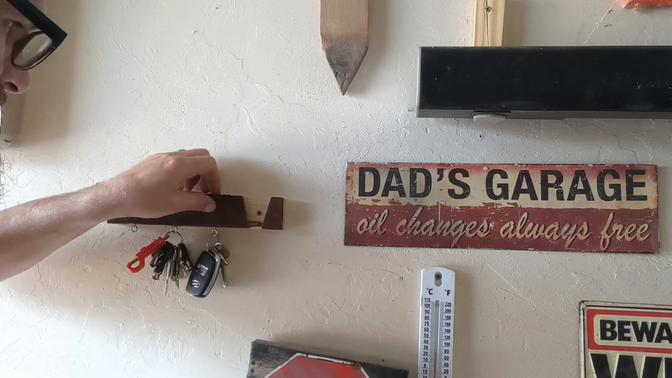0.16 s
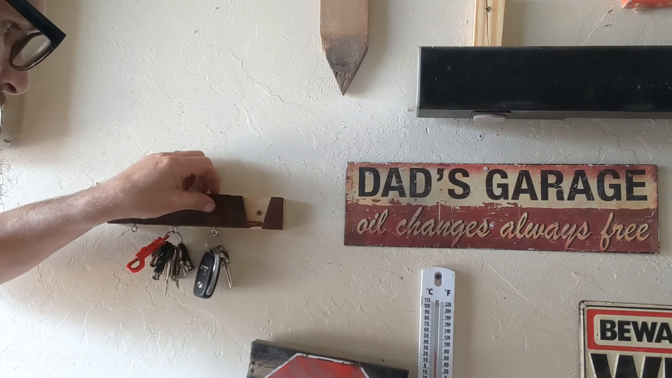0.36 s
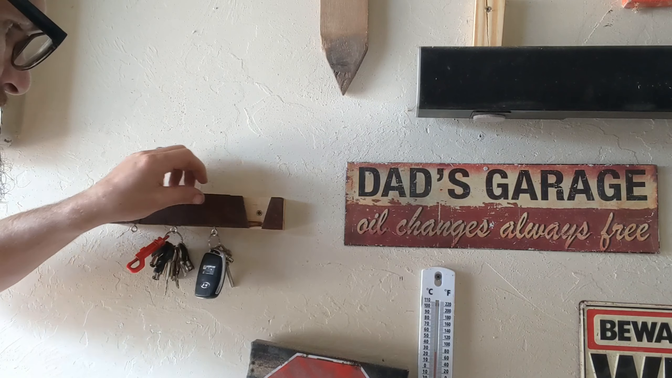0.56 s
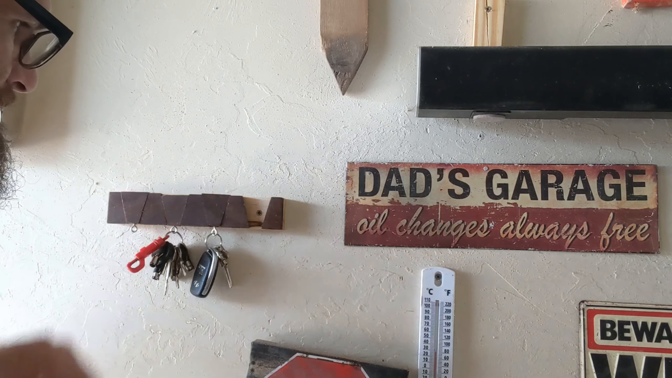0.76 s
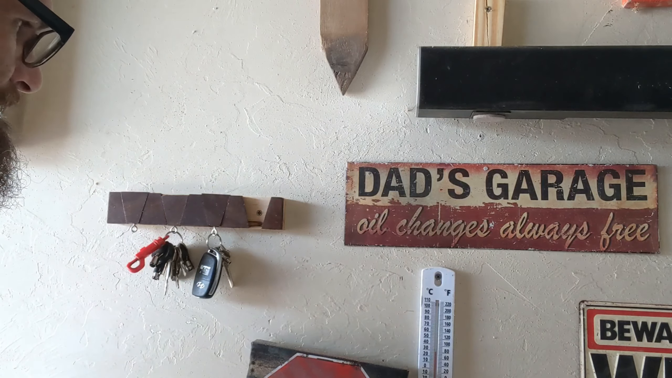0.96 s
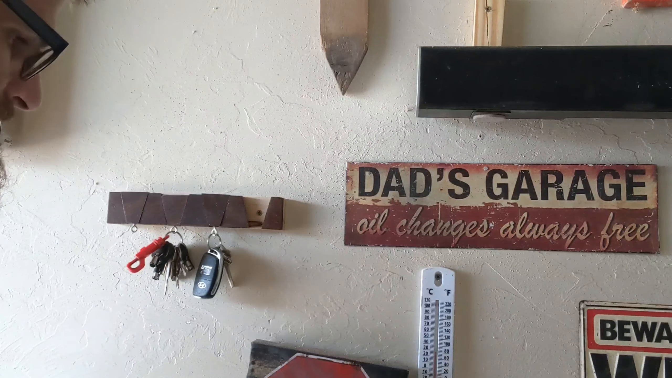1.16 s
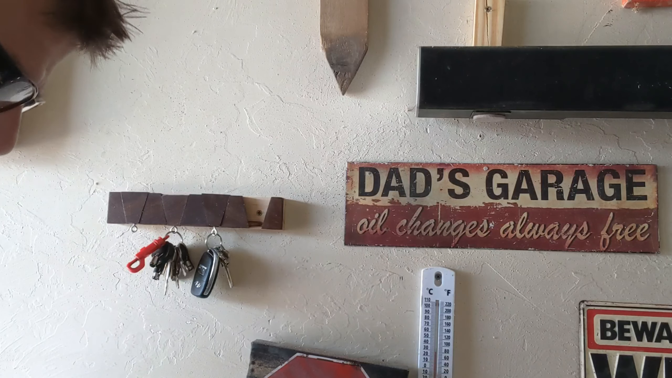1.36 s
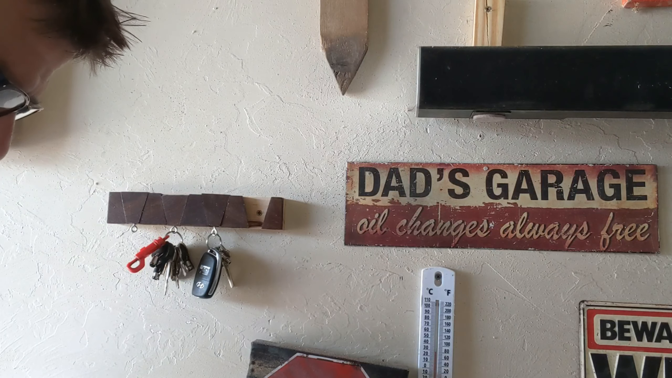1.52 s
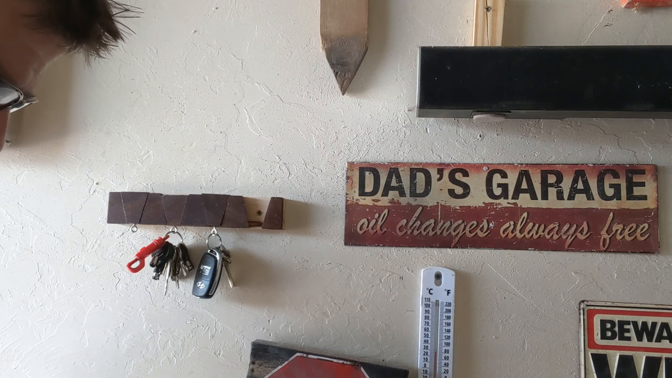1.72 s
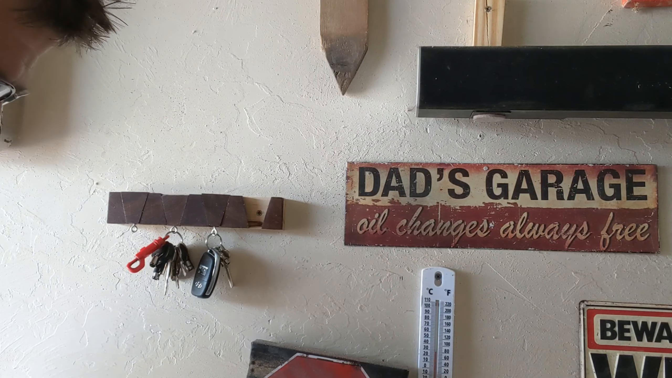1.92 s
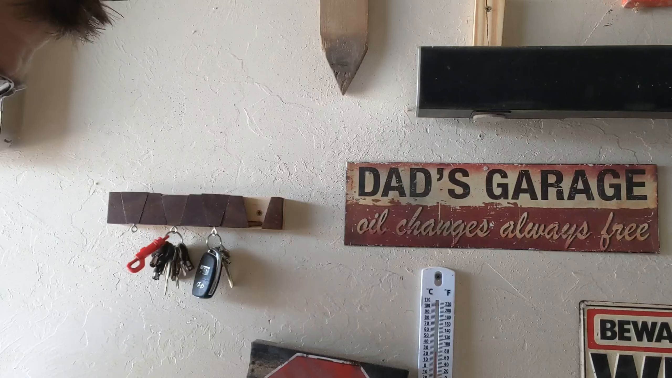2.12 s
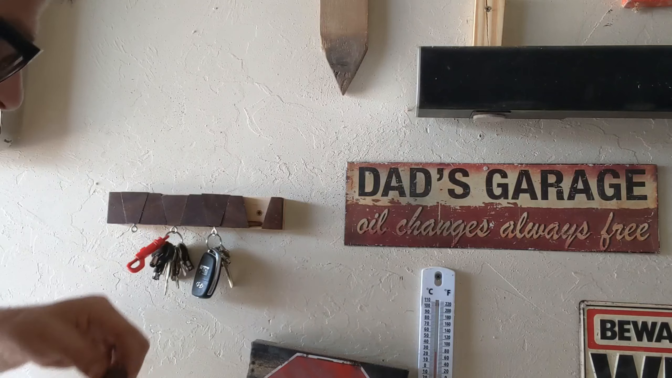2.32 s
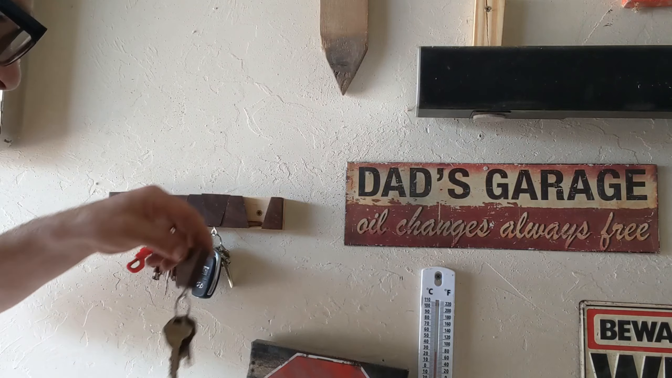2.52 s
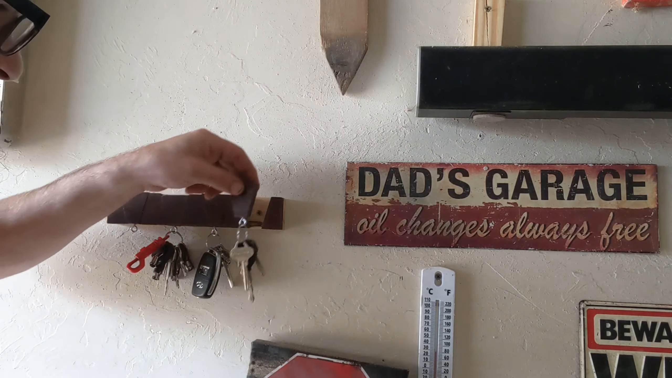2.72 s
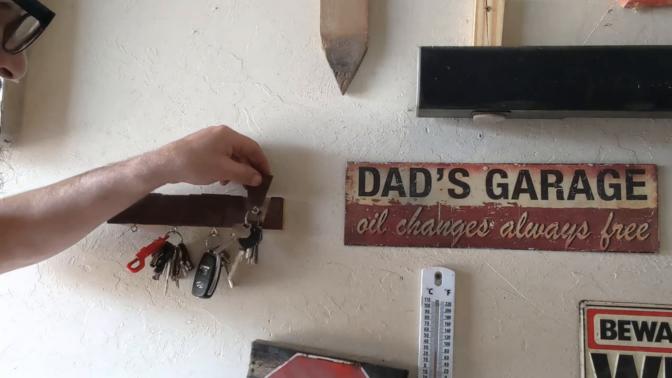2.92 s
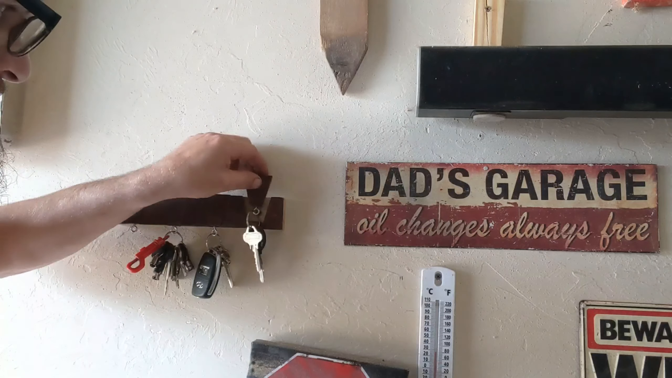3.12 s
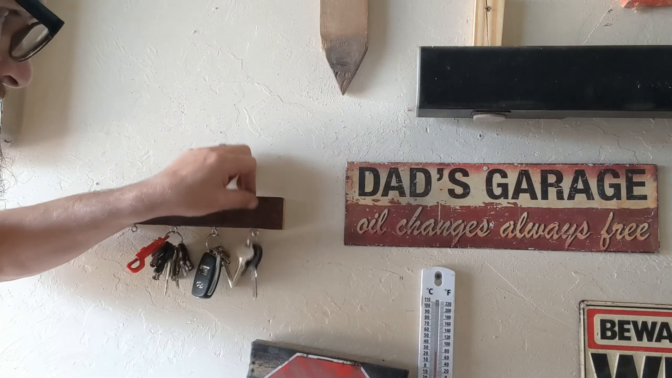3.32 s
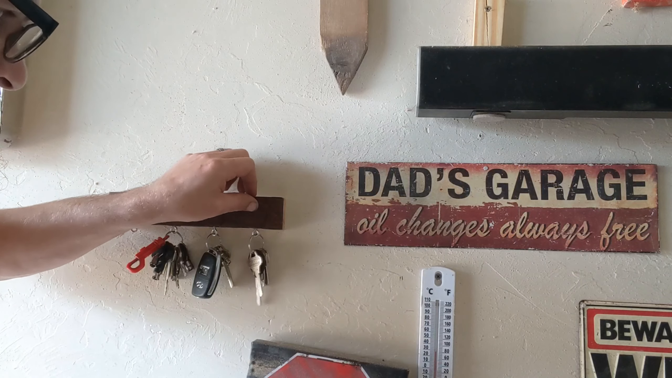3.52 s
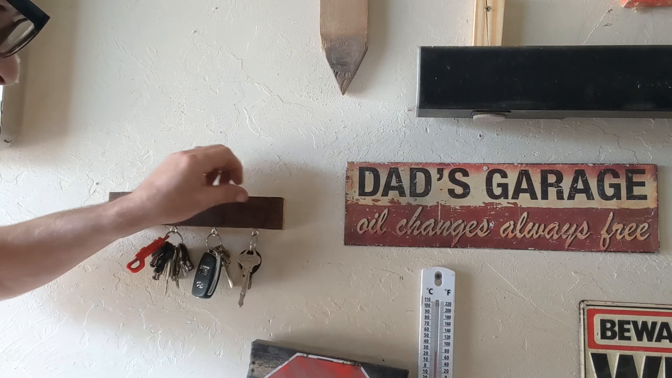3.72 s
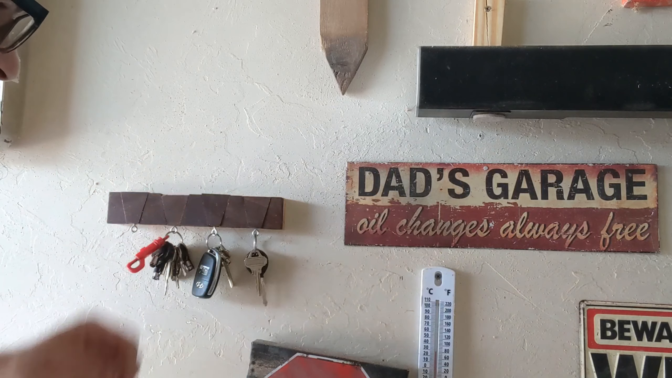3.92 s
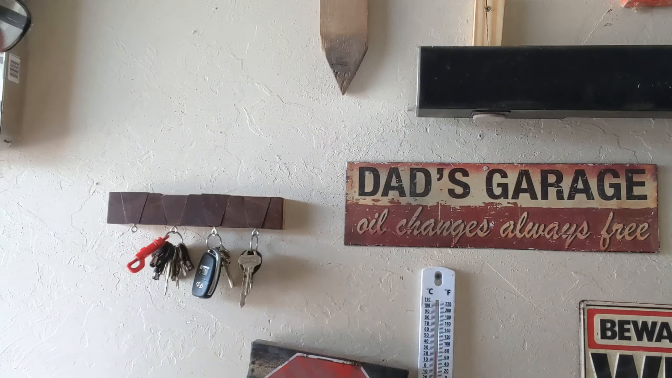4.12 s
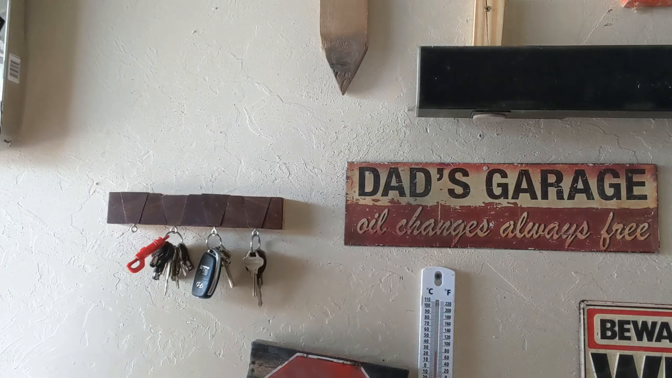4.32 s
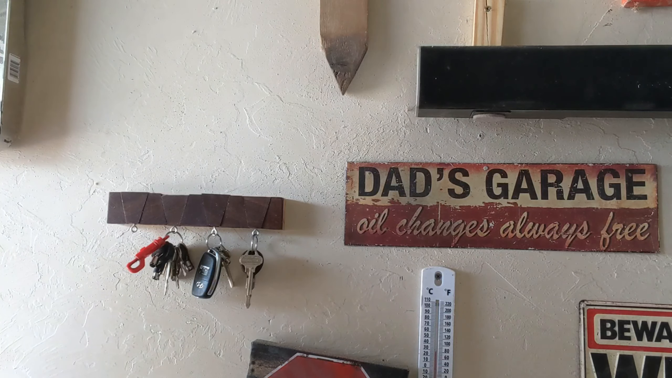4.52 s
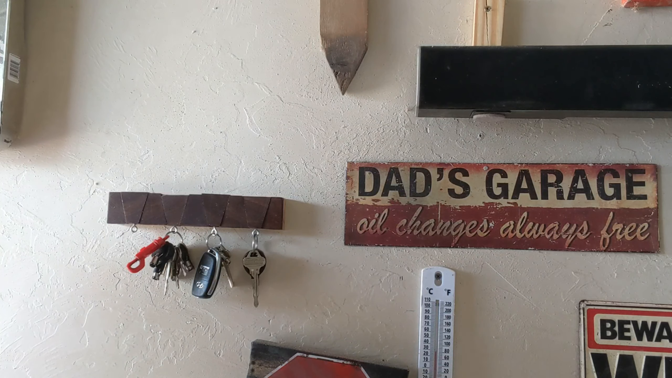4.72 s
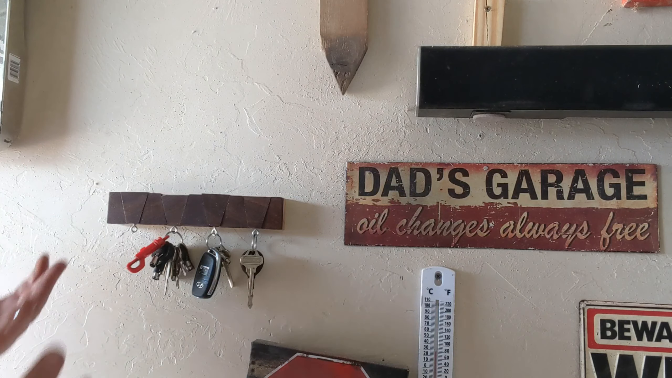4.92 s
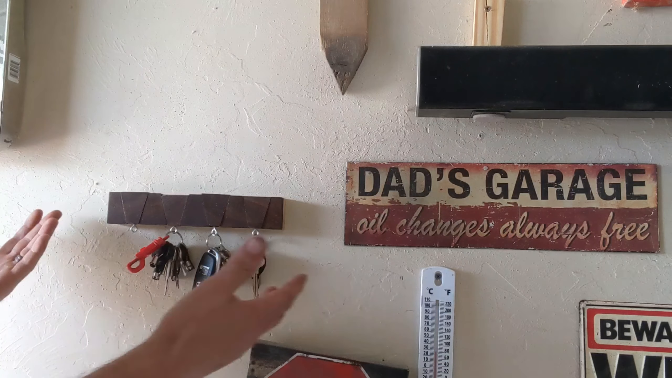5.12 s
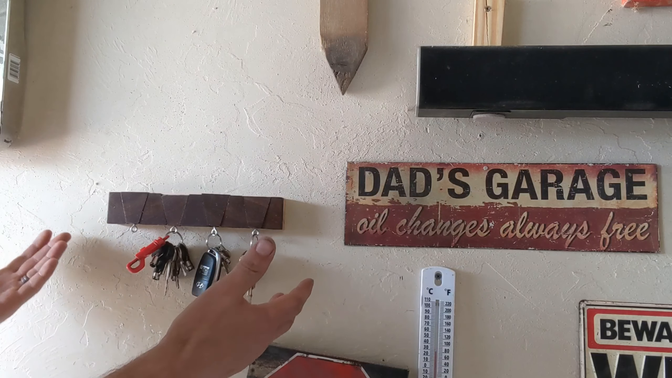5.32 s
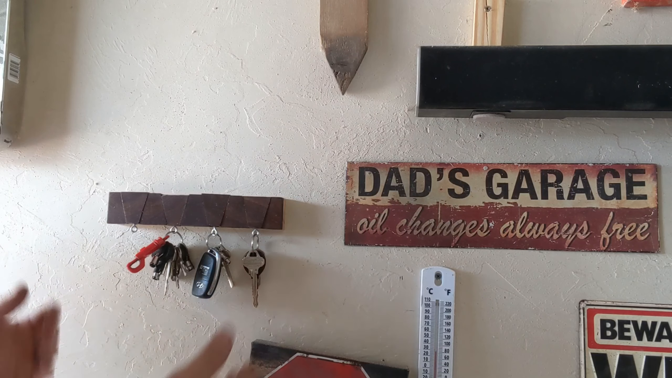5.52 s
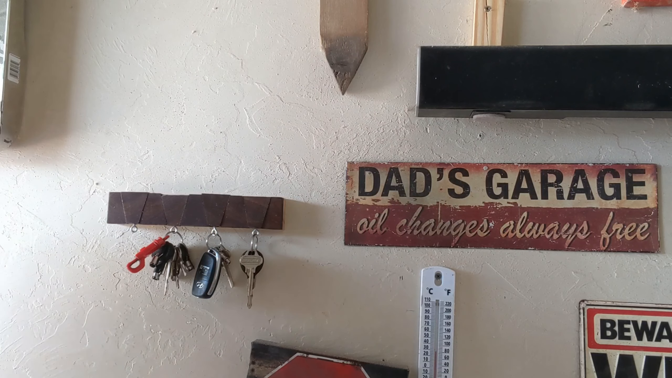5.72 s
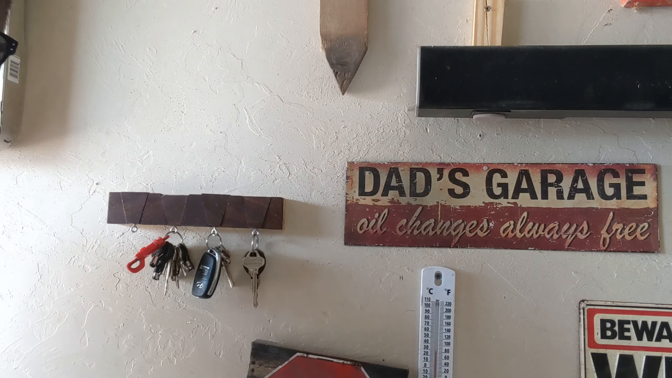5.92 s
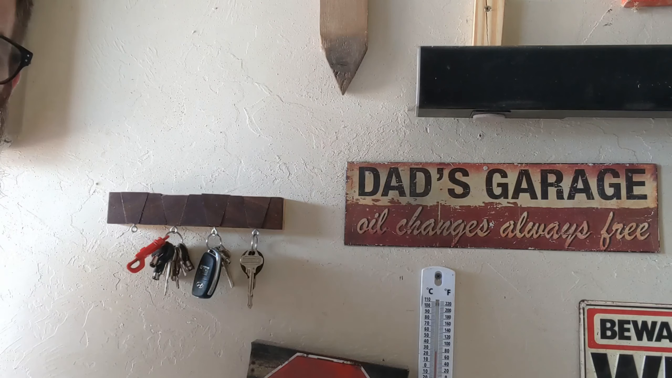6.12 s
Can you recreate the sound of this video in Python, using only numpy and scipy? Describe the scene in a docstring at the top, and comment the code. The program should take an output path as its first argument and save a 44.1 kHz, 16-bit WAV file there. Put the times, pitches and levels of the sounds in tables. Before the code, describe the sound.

Close to the microphone, a soft footstep and scuff come first, then a near-quiet gap. A bunch of keys jingles in a bright burst, tinkles more lightly, and clinks again. A hard clack of metal on wood follows, then a denser rattle as the bunch is hung. Small scuffs and a last soft step end it. A bare garage echoes briefly over low rumble and hum.

```python
"""Keys clink and ring, wooden pegs knock a rack, and hands and shoes scuff, echoing between bare walls over a low rumble:
bunches of keys are lifted, carried and hung on a wooden rack on a garage wall, close to a phone.
Metal contacts are noise cracks that stir the key modes; wood and floor are banks of decaying modes.
Rubs are dense noise slips; the echo is decaying noise, and the background is coloured noise with a hum."""
import sys
import numpy as np
from scipy import signal
from scipy.fft import rfft, irfft, next_fast_len
from scipy.io import wavfile
from scipy.ndimage import uniform_filter1d

SR = 44100
rng = np.random.default_rng(int(sys.argv[2]) if len(sys.argv) > 2 else 0)


def wav_record(signal):
    """Record a signal, one row per channel, as 16-bit PCM in the file named by sys.argv[1]."""
    frames = np.transpose(np.atleast_2d(signal))
    bounded = np.clip(frames, -1, 1)
    # unit amplitude maps onto the largest positive 16-bit level
    quanta = np.round(bounded * 32767).astype(np.int16)
    wavfile.write(sys.argv[1], SR, quanta)


N = 271656
T = np.arange(N) / SR


def undb(db):
    """Level law: decibels become an amplitude ratio."""
    return 10 ** (np.asarray(db) / 20)


def unit(x):
    """Normalisation: scale to an rms of one."""
    return x / np.sqrt(np.mean(x ** 2))


def on_log(hz, table):
    """Logarithmic pitch scale: interpolate a table of frequency in Hz and value."""
    table = np.array(table)
    return np.interp(np.log(hz + 1), np.log(table[:, 0]), table[:, 1])


def band(x, lo_hz, hi_hz):
    """Band-pass filtering: keep the sound between two frequencies."""
    return signal.sosfilt(signal.butter(2, [lo_hz, hi_hz], "band", fs=SR, output="sos"), x)


def colour(x, table):
    """Spectral shaping: weight the spectrum by a table of frequency in Hz and gain in dB."""
    length = x.shape[-1]
    size = next_fast_len(length)
    gain = undb(on_log(np.fft.rfftfreq(size, 1 / SR), table))
    return irfft(rfft(x, size) * gain, size)[..., :length]


def walk(rate):
    """Slow random modulation: a new random level every 1 / rate s, joined by straight slopes; spread near 1."""
    hold = int(SR / rate)
    levels = np.repeat(rng.standard_normal(N // hold + 1), hold)
    return uniform_filter1d(levels, hold)[:N]


def ring(times, db, modes, scatter_db, push_s):
    """Modal resonance: each blow pushes every mode for push_s, in shares that vary with where it lands."""
    out, at = np.zeros(N), (np.asarray(times) * SR).astype(int)
    luck = rng.standard_normal((len(at), len(modes)))
    push = np.hanning(int(push_s * SR) + 3)[1:-1]
    push = push / push.sum()
    for k, (hz, mode_db, t60) in enumerate(modes):
        blows = np.zeros(N)
        np.add.at(blows, at, undb(db + mode_db + scatter_db * luck[:, k]))
        decay = np.log(1000) / (max(t60, .005) * SR)
        pole = np.exp(2j * np.pi * hz / SR - decay)
        # turning the push with the mode keeps even a long push in step with it
        carried = np.convolve(blows, push * pole ** np.arange(len(push)))[:N]
        out += signal.lfilter([1], [1, -pole], carried).imag
    return out


def bursts(times, db, fade_s, rise_s):
    """Impact noise: at each blow an exponential decay, its onset smoothed over rise_s, shapes noise."""
    blows = np.zeros(N)
    np.add.at(blows, (np.asarray(times) * SR).astype(int), undb(db))
    shape = signal.lfilter([1], [1, -np.exp(-1 / (fade_s * SR))], blows)
    return uniform_filter1d(shape, int(rise_s * SR) + 1) * rng.standard_normal(N)


# Likeness of far sound at the two ports. Each row: frequency in Hz, left-right correlation [none].
FAR_LIKENESS = [(50, 0.91), (250, 0.9), (1000, 0.167), (3000, 0.062), (7000, 0.22), (16000, .5)]


def spread(mid, side):
    """Diffuse-field coherence: two unrelated sounds make a left and right as alike as far sound is."""
    like = [(hz, np.clip(c, 0, .99)) for hz, c in FAR_LIKENESS]
    mid = colour(mid, [(hz, 10 * np.log10((1 + c) / 2)) for hz, c in like])
    side = colour(side, [(hz, 10 * np.log10((1 - c) / 2)) for hz, c in like])
    return np.array([mid + side, mid - side])


# Spectrum of the background. Each row: frequency in Hz, relative density in dB per Hz.
AIR_SPECTRUM = [(15, -28), (25, -17.5), (70, 1.5), (166, 0.5), (236, -7), (317, -18.5), (754, -19.5),
                (1100, -27.5), (1740, -27.5), (4610, -35), (8140, -39.5), (11300, -36.5), (14400, -40),
                (16000, -45.5)]
AIR_DB = -44.5  # middle of the wandering level
HUM_HZ, HUM_DB = 57.5, -48  # middles of the wandering pitch and level


def air():
    """Broadband and tonal background: outside rumble and faint hiss swell a little beside a wavering hum."""
    noise = spread(*colour(rng.standard_normal((2, N)), AIR_SPECTRUM))
    hum_level = undb(HUM_DB + 2.32 * walk(11.0))
    hum_phase = 2 * np.pi * np.cumsum(HUM_HZ + 3 * walk(7.3)) / SR
    hum = hum_level * np.sin(hum_phase)
    return undb(AIR_DB + 2.86 * walk(2.806)) * unit(noise) + hum


# Reverberation of the garage. Each row: frequency in Hz, time to fall by 60 dB in seconds.
GARAGE_T60 = [(150, 0.72), (1000, 0.54), (4000, 0.6), (9000, 0.28), (15000, 0.29)]
ECHO_DB = -7.5  # level of the echoes


def garage(x):
    """Statistical reverberation: dense echoes as noise that decays at its own pace in each octave."""
    t, tail = T[:SR // 2], 0
    for hz in 68.9 * 2. ** np.arange(9):
        noise = band(rng.standard_normal((2, len(t))), hz / 2 ** .5, min(hz * 2 ** .5, 20000))
        tail = tail + noise * np.exp(-np.log(1000) * t / on_log(hz, GARAGE_T60))
    first_walls = np.clip((t - .002) / 0.0028, 0, 1)  # they answer after a few ms
    tail = spread(*tail * first_walls)
    tail = tail / np.sqrt(np.sum(tail ** 2) / 2)
    return signal.fftconvolve(x[None], tail)[:, :N]


# Heels set down. Each row: start in seconds, relative thump level in dB, slap against it in dB.
HEELS = [(0.137, -21.5, -1), (5.862, -17, -1.5)]
# Modes of the floor slab. Each row: frequency in Hz, relative level in dB, time to fall by 60 dB in seconds.
SLAB_MODES = [(138, 1.5, 0.21), (258, -12, 0.13), (57.6, 7, 0.037)]


def steps():
    """Damped floor resonance: soft soles thump the slab, with a dull slap."""
    s, db, slap_db = np.transpose(HEELS)
    slap = band(bursts(s - .014, db + slap_db + 9, 0.019, 0.014), 210, 1120)
    return ring(s, db, SLAB_MODES, scatter_db=-4.5, push_s=0.0069) + slap


# Modes of the keys and rings of the bunch. Each entry: frequency in Hz.
KEY_MODES = np.array([3650, 3860, 6209, 7210, 8595, 9028, 9685, 9790, 10140, 10310, 10620, 11600, 11640, 11700, 12531, 12890, 13260, 13670, 13907, 14680, 15229])


def metallic(x, width_hz):
    """Resonant filtering: sound heard through the damped modes of the bunch, without the two lowest."""
    return sum(signal.lfilter(*signal.iirpeak(hz, hz / width_hz, SR), x) for hz in KEY_MODES[2:])


# Rubs of hands, shoes and key rings. Each row: time of greatest strength in seconds, bright level in dB,
# dull part against it in dB, swell constant in seconds, fade constant in seconds.
RUBS = [(0.0, -60, 24, .01, 0.024), (0.118, -30.5, 7.5, 0.026, 0.034), (0.168, -36.5, -2, 0.022, 0.052),
        (0.94, -48.5, -23, .012, .06), (1.08, -50.5, -7.5, 0.031, .15), (1.219, -24.5, -16, 0.026, 0.032),
        (1.289, -28.5, -21, 0.033, 0.024), (1.491, -29, -16, .03, 0.0093),
        (1.56, -45.5, -3.5, 0.0077, 0.097), (1.62, -58, 4.5, 0.036, .05), (1.82, -51.5, -21, .03, .02),
        (1.94, -35, -36, 0.015, 0.025), (1.99, -45.5, -19, .01, 0.12), (2.281, -36.5, -24.5, 0.019, 0.085),
        (2.468, -33, -24.5, 0.011, 0.053), (2.878, -22, -2.5, 0.0042, 0.06), (3.21, -48.5, 7, 0.043, 0.3),
        (3.381, -18.5, -5, 0.013, 0.055), (3.48, -21.5, -4.5, 0.026, .02),
        (3.53, -24.5, -5.5, 0.0057, 0.039), (3.94, -57.5, -6, 0.057, 0.087),
        (4.149, -44, 5.5, 0.034, 0.044), (4.369, -48.5, -1, 0.12, .08), (4.751, -46.5, -2.5, 0.11, 0.083),
        (5.281, -47.5, -2, 0.045, 0.077), (5.831, -41, 3, 0.0077, 0.047), (5.88, -40.5, 2, 0.03, 0.063)]
RUB_MIDDLE_DB, RUB_MIDDLE_SHARE = -3.5, 0.37  # the middle part follows the dull part by this share
# rubs with less dull part than this are metal on metal: part of their bright power stirs the key modes
METAL_BELOW_DB, METAL_SHARE, METAL_WIDTH_HZ = -10, .6, 60


def rubbing():
    """Stick-slip friction: dense tiny slips of uneven size sound bright and dull as each rub swells and fades."""
    slips = rng.standard_normal(N) * undb(2.2 * rng.exponential(size=N) + 1.8 * walk(120))
    parts = []
    for lo_hz, hi_hz in [(7500, 17700), (1400, 4090), (295, 1760)]:
        lumps = undb(2 * walk(140))  # each part catches and slips in its own lumps
        parts.append(unit(band(slips, lo_hz, hi_hz) * lumps))
    parts.append(unit(metallic(parts[0], METAL_WIDTH_HZ)))
    power = np.zeros((len(parts), N))
    for s, db, dull_db, swell_s, fade_s in RUBS:
        shape = undb(db) * np.exp(-np.where(T < s, (s - T) / swell_s, (T - s) / fade_s))
        metal = METAL_SHARE * (dull_db < METAL_BELOW_DB)
        middle = undb(RUB_MIDDLE_DB + RUB_MIDDLE_SHARE * dull_db) ** 2
        shares = [1 - metal, middle, undb(dull_db) ** 2, metal]
        power += np.outer(shares, shape ** 2)
    return np.sum(np.sqrt(power) * parts, axis=0)


# Wood on wood. Each row: start in seconds, relative knock level in dB, wall boom against it in dB.
PEG_KNOCKS = [(0.113, -13.5, -4.5), (0.388, -37, -8), (1.222, -18.5, -15), (1.285, -26, -17),
              (1.483, -22, -17), (2.87, -9.5, -2), (2.883, -5, -5), (2.93, -22, 10.5), (3.061, -21.5, -16),
              (3.198, -19.5, -7.5), (3.355, -16, -27), (3.398, -8, -14), (3.469, -6.5, -12.5),
              (3.504, -13.5, -40), (3.537, -14.5, -11), (3.921, -20.5, -15.5), (4.147, -26.5, -3.5),
              (4.584, -31.5, -14), (4.675, -36, -21), (5.357, -31.5, -9.5), (5.847, -24, 1.5)]
# Modes of the board. Each row: frequency in Hz, relative level in dB, time to fall by 60 dB in seconds.
RACK_MODES = [(524, -13, 0.12), (728, 4, 0.031), (1324, -3, 0.1), (1690, 7, 0.029), (2570, -16, 0.034),
              (3240, 16.5, 0.0051), (4220, -14.5, 0.033)]
# Modes of the hollow wall. Each row: frequency in Hz, relative level in dB, time to fall by 60 dB in seconds.
WALL_MODES = [(200.1, -1, 0.17), (304.4, -4, 0.081), (141.7, -7.5, 0.3), (498.6, -11.5, 0.12)]


def rack():
    """Coupled plate resonance: a peg knocks out a dry rap, short wood modes, and the hollow wall behind."""
    s, db, boom_db = np.transpose(PEG_KNOCKS)
    rap = undb(3.66 * walk(250)) * band(bursts(s, db - 7.0, 0.014, 0.0054), 306, 3215)
    wood = ring(s, db - 19.5, RACK_MODES, scatter_db=2.5, push_s=0.00096)
    boom = ring(s, db + boom_db - 3.5, WALL_MODES, scatter_db=3.5, push_s=0.0071)
    return rap + wood + boom


# A ring chafes on its hook. Each row: start in seconds, length in seconds, centre in Hz,
# middle of the wandering level in dB.
HOOK_CHAFES = [(1.92, 0.17, 3860, -50.5), (3.944, 0.14, 3870, -54.5), (4.403, 0.16, 4060, -58.5),
               (4.749, 0.045, 3370, -49.5)]


def chafes():
    """Narrow-band friction noise: thin, rough squeaks."""
    out = 0
    for s, length, hz, db in HOOK_CHAFES:
        swell = np.sin(np.pi * np.clip((T - s) / length, 0, 1)) ** .5
        squeak = unit(band(rng.standard_normal(N), hz - 230, hz + 230))
        out = out + undb(db + 3 * walk(90)) * swell * squeak
    return out


# Clear pings. Each row: start in seconds, frequency in Hz (the nearest key mode sounds),
# relative level in dB, time until a finger or another key stops it in seconds.
FREE_PINGS = [(0.944, 9900, -48.5, 0.018), (1.201, 9860, -24, 0.052), (1.199, 10140, -20, 0.024),
              (1.206, 8595, -29, 0.013), (1.205, 10310, -26, 0.027), (1.209, 12531, -14.5, 0.055),
              (1.208, 9028, -26.5, 0.037), (1.211, 13907, -35, 0.12), (1.228, 6209, -30.5, 0.058),
              (1.249, 15229, -20, 0.079), (1.253, 9028, -41, 0.2), (1.277, 6209, -25.5, 0.036),
              (1.281, 10140, -25, 0.019), (1.282, 10310, -28, 0.15), (1.293, 11640, -37, 0.042),
              (1.374, 11640, -34, 0.038), (1.421, 11640, -27.5, 0.014), (1.436, 7210, -37, 0.093),
              (1.455, 11600, -22, 0.018), (1.473, 6209, -34, 0.017), (1.474, 10310, -17, 0.0078),
              (1.476, 13907, -35, 0.066), (1.479, 15229, -32, 0.033), (1.557, 7210, -36, 0.0093),
              (1.807, 11600, -39, 0.01), (2.256, 11900, -40, 0.033), (2.26, 15229, -31, 0.061),
              (2.286, 7210, -30.5, 0.0069), (2.396, 11820, -21.5, 0.022), (2.413, 9685, -43.5, 0.022),
              (2.463, 13907, -49, 0.027), (2.466, 15229, -45, 0.046), (2.472, 11640, -41, 0.029),
              (2.886, 11860, -21.5, 0.035), (2.994, 11640, -35.5, 0.013), (3.203, 11880, -25, 0.018),
              (3.393, 3860, -16.5, 0.0079), (3.429, 9028, -54, 0.037), (3.435, 11640, -23.5, 0.015),
              (3.475, 13907, -16.5, 0.017), (3.483, 11640, -27, 0.033), (3.508, 13907, -47, 0.096),
              (3.599, 11800, -43, 0.056), (3.651, 6209, -54, 0.37)]
FREE_T60_S, STOPPED_T60_S = 0.52, 0.036  # the stopped damping adds to the free damping


def pings():
    """Beating of close modes: a key struck while it hangs free sings with a near twin until it is touched."""
    out, t = np.zeros(N + SR), T[:SR // 2]
    phases = 2 * np.pi * rng.random((len(FREE_PINGS), 2))
    for (s, hz, db, free_s), (one, two) in zip(FREE_PINGS, phases):
        hz = KEY_MODES[np.argmin(abs(KEY_MODES - hz))]
        stopped_for = np.maximum(t - free_s, 0)
        fade = np.exp(-np.log(1000) * (t / FREE_T60_S + stopped_for / STOPPED_T60_S))
        tone = np.sin(2 * np.pi * hz * t + one) + 0.29 * np.sin(2 * np.pi * (hz + 45) * t + two)
        start = int(s * SR)
        out[start:start + len(t)] += undb(db) * np.clip(t / 0.0014, 0, 1) * fade * tone
    return out[:N] * undb(2.2 * walk(90))  # light touches of neighbours make the rings flutter


def tinkles(times, db, count):
    """Repeated impact: after a contact the keys bounce, and each bounce rings one mode for a moment."""
    out, t = np.zeros(N + SR), T[:SR // 16]
    for s, top_db, luck in zip(times, db, rng.random((len(times), count, 4))):
        for late, pick, size, slack in luck:
            at = int((s + 0.052 * late ** 2) * SR)
            mode = KEY_MODES[2 + int(pick * (len(KEY_MODES) - 2))]
            hz = mode * (1 + 0.018 * (slack - .5))
            gain = undb(top_db - 14 * late - 10 * size + 6 * np.log2(hz / 12000))
            fade = np.exp(-np.log(1000) * t / (0.005 + 0.022 * slack))
            out[at:at + len(t)] += gain * fade * np.sin(2 * np.pi * hz * t)
    return out[:N]


SWING_FROM_S, SWING_TO_S = .86, 2.6
FAINT_DB, FAINT_SCATTER_DB, FAINT_DULL_DB = -39.5, 2.5, -17.5


def faint_clinks(count):
    """Random impact train: faint contacts, as rows of the clink table, scattered over the swinging."""
    s = SWING_FROM_S + (SWING_TO_S - SWING_FROM_S) * (np.arange(count) + rng.random(count)) / count
    db = FAINT_DB + FAINT_SCATTER_DB * rng.standard_normal(count)
    return np.column_stack([s, db, np.full(count, FAINT_DULL_DB)])


# Metal on metal. Each row: start in seconds, relative level of the bright crack in dB,
# dull part against it in dB.
KEY_CLINKS = [(0.8769, -39.5, -14), (0.9467, -24.5, -14), (1.0799, -25, -14), (1.1313, -25.5, -11.5),
              (1.1752, -22, -4.5), (1.1867, -16, -7), (1.2077, -13, -10.5), (1.2114, -6, -19),
              (1.2244, -7, -15.5), (1.2444, -21, -30.5), (1.2834, -13.5, -4), (1.3743, -18, -10),
              (1.4222, -19, -16), (1.4544, -16.5, -32), (1.4731, -15.5, -6), (1.4894, -12, -9.5),
              (1.5599, -10.5, -31), (1.5955, -19.5, -31), (1.6891, -30, -28), (1.725, -30.5, -25),
              (1.8294, -40, -24), (1.9281, -19, -20), (1.9385, -22, -11.5), (1.951, -20, -13.5),
              (1.9889, -12.5, -15.5), (2.0497, -36, -14.5), (2.2603, -11.5, -42), (2.2917, -6, -26),
              (2.3984, -23, -32), (2.4653, -14, -19.5), (2.4794, -19, -25), (2.5094, -23, -21),
              (2.7496, -41, -4.5), (2.8704, -8, -17.5), (2.8814, 0, -13), (3.0594, -30, -10),
              (3.1991, -20.5, -9), (3.2794, -30.5, -4), (3.3674, -7, 2), (3.3987, -4.5, -5.5),
              (3.4331, -23, -16), (3.478, -21, -8), (3.5045, -15, 0), (3.5294, -23.5, 1.5),
              (3.555, -28, -2), (3.9195, -37.5, 5.5), (4.5835, -34.5, -12)]
MIDDLE_DB, MIDDLE_SCATTER_DB = -11, 4.5  # middle part against the crack
BOUNCE_DB = -12  # bounces against the crack


def clinks():
    """Impact excitation: each contact is a gritty crack in three parts that stirs the modes, then bounces."""
    s, db, dull_db = np.vstack([KEY_CLINKS, faint_clinks(count=18)]).T
    middle_db = MIDDLE_DB + MIDDLE_SCATTER_DB * rng.standard_normal(len(s))
    grit = undb(1.17 * walk(600))
    bright = band(grit * bursts(s, db, 0.0021, 0.0049), 9500, 19200)
    middle = band(grit * bursts(s, db + middle_db, 0.0013, 0.013), 3400, 4800)
    dull = band(grit * bursts(s, db + dull_db, 0.0049, 0.00209), 1200, 6500)
    crack = bright + middle
    treble = .6 * crack + 1.3 * metallic(crack, width_hz=110)
    return treble + dull + tinkles(s, db + BOUNCE_DB, count=8)


# Scattering close by. Each row: frequency in Hz, scattered against direct sound in dB.
NEAR_SCATTER = [(60, -20.5), (400, -16.5), (1500, -0.5), (4000, 0.5), (9000, -3.5), (16000, -6)]


def close(x):
    """Near-field scattering: the wall and rack beside the phone scatter the sound unlike to each port."""
    t = T[:SR // 40]
    scatter = rng.standard_normal(len(t)) * np.exp(-t / 0.0062)
    scatter = scatter / np.sqrt(np.sum(scatter ** 2))
    side = colour(signal.fftconvolve(x, scatter)[:N], NEAR_SCATTER)
    return np.array([x + side, x - side])


# Shading by the phone body. Each row: frequency in Hz, left minus right in dB.
PORT_SHADING = [(60, 1.6), (300, 1.2), (700, -1.4), (1500, 2), (3000, 2.5), (8000, 3.5), (11000, 3),
                (16000, -6)]


def scene():
    """Superposition and shading: direct sound, echoes and background add, and the phone body shades each port."""
    near = clinks() + pings() + chafes() + rack() + steps() + rubbing()
    heard = close(near) + undb(ECHO_DB) * garage(near) + air()
    left = colour(heard[0], [(hz, db / 2) for hz, db in PORT_SHADING])
    right = colour(heard[1], [(hz, -db / 2) for hz, db in PORT_SHADING])
    return np.array([left, right])


TOP_HZ = 15900


def record(dry):
    """Band limiting and clipping: the lowest bass is lost, peaks past full scale clip, the top is cut."""
    dry = signal.sosfilt(signal.butter(4, 42, "high", fs=SR, output="sos"), dry)
    return signal.sosfilt(signal.ellip(10, .2, 60, TOP_HZ, fs=SR, output="sos"), np.clip(dry, -1, 1))


dry = scene()
out = record(dry)
wav_record(out)
```